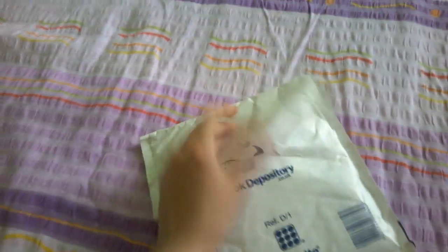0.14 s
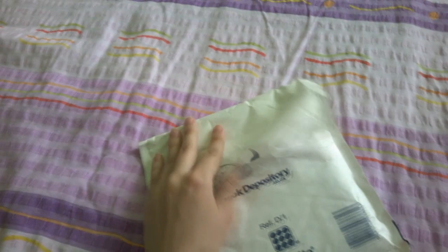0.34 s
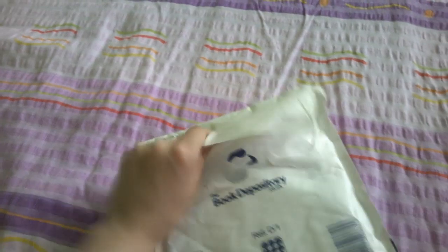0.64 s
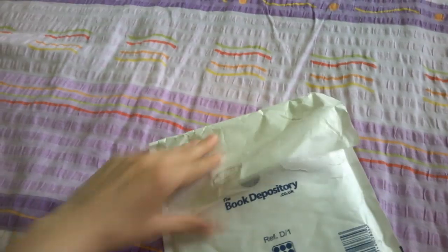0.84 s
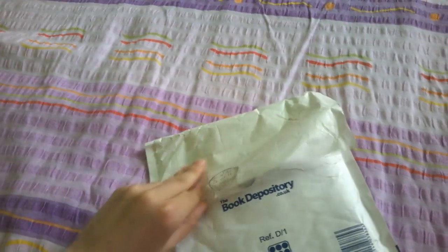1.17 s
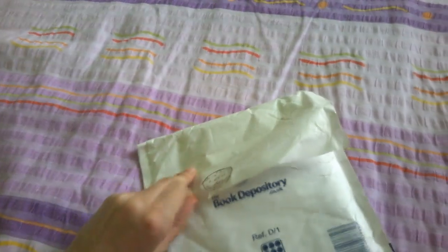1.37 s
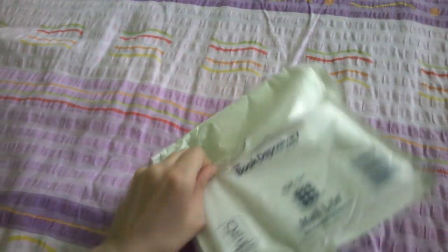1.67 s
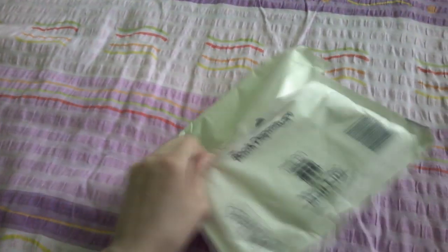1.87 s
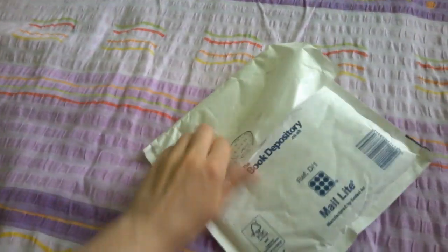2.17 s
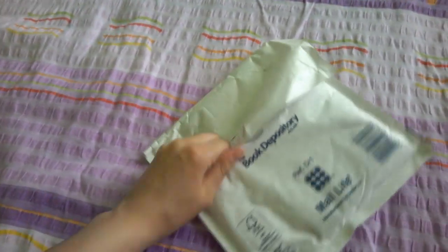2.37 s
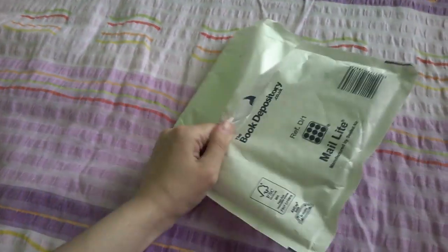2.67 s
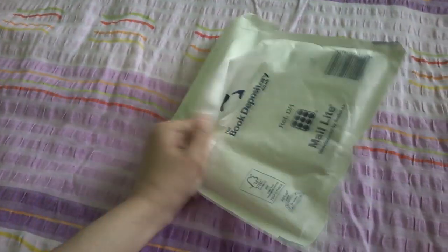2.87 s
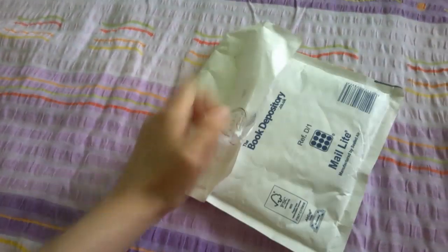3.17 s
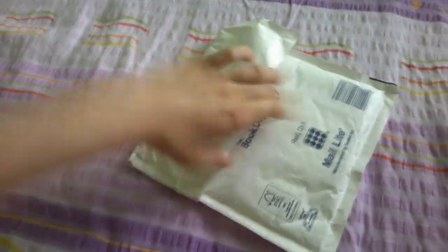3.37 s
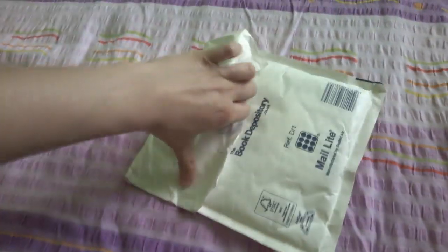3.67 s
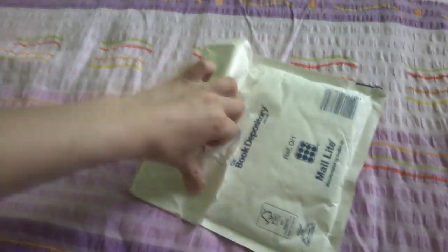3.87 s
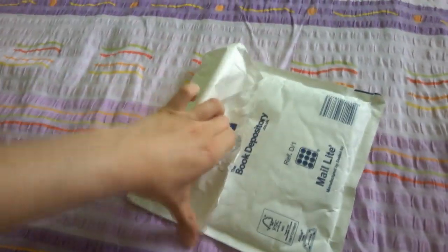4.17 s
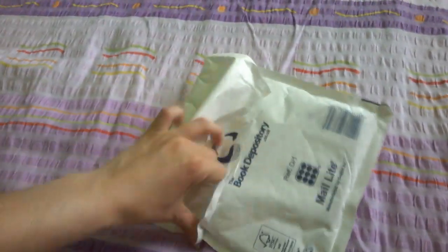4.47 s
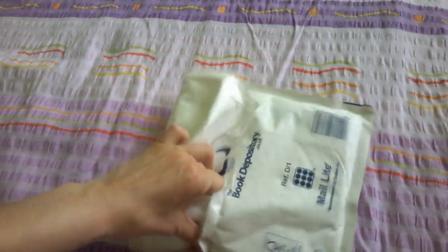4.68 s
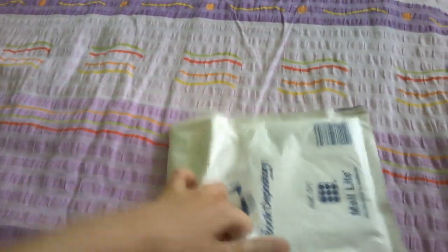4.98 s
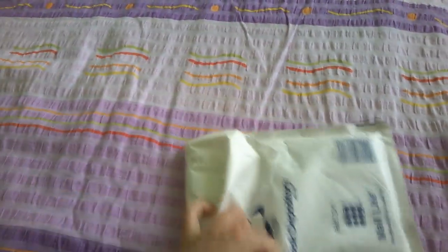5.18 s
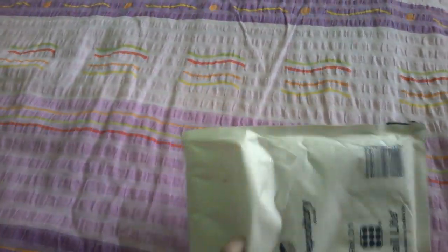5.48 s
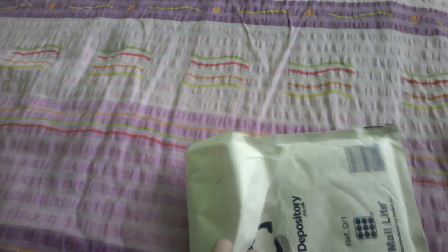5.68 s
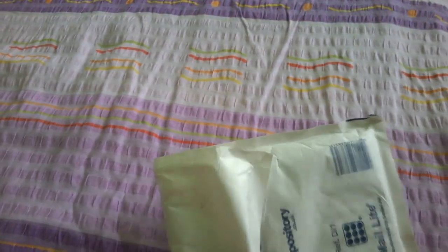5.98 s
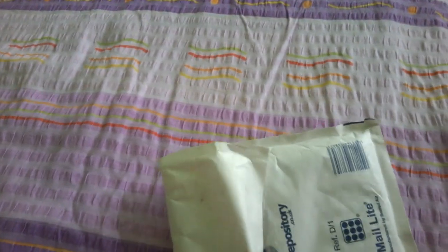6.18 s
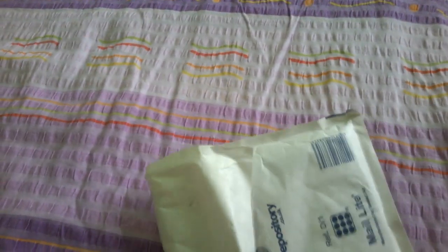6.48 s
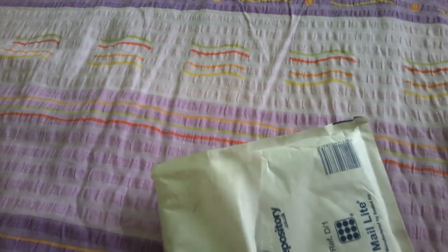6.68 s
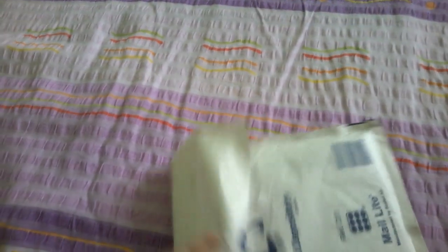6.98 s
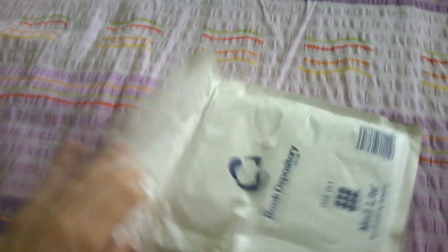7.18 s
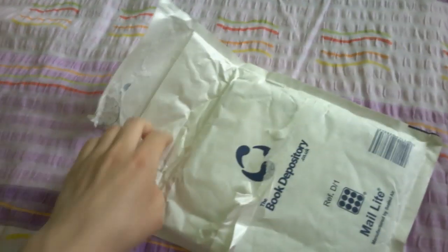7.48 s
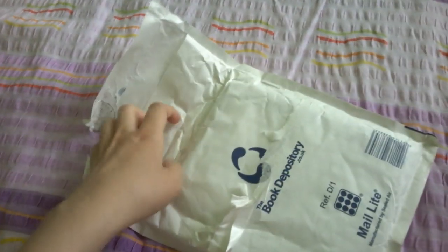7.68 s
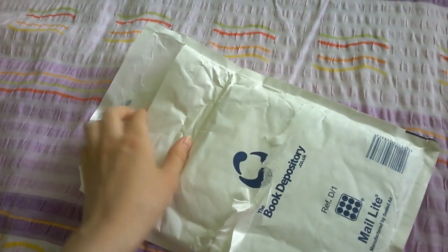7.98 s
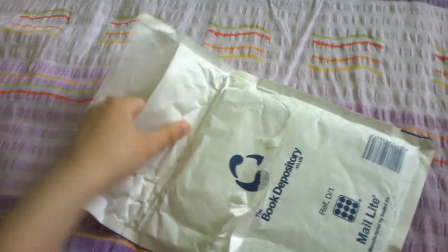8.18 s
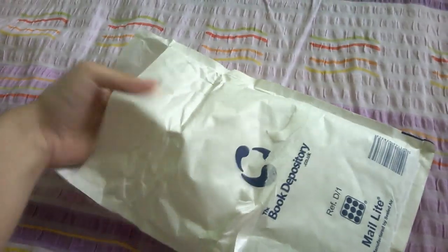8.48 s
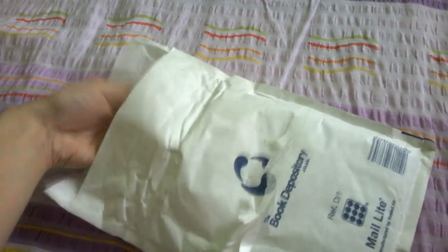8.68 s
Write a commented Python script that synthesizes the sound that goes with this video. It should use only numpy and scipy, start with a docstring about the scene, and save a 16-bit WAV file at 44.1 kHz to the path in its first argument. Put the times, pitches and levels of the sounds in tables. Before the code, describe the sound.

Dry, close, single-channel sound of a padded paper mailer being gripped, torn and crumpled on a bed. From 0 to 0.9 s there are brisk crinkles and hard snaps, the strongest near 0.6 s. From 1 to 2.5 s it is sparser, with separate sharp ticks over faint rustle. A bright crack at about 2.65 s leads to a cluster around 3 s with a barely audible soft puff, then a quieter gap. From 3.9 to 5.5 s dense tearing crackle and many snaps arrive, some low and boomy. After a thinner stretch near 6 s, busy ripping pops return from 6.3 to 6.85 s. From 7 s it is mostly light, small rustles, with clearer snaps around 7.8, 8.2 and 8.5 s and a faint puff near 8.8 s. A distant low wavering engine hum swells around 5.5-6.5 s, then fades into quiet low room air.

```python
"""Dense crackle and sharp snaps, heard close: one hand tears and crumples a padded paper mailer on a bed.
Each crease is a millisecond pop and noise burst, coloured by band, with a faint rattling tail.
Soft low puffs of band-passed noise mark the packet meeting the bedding.
Far behind, three wavering harmonics drone like an engine over drifting, filtered-noise air."""
import sys
import numpy as np
from scipy import signal
from scipy.fft import rfft, irfft
from scipy.io import wavfile
from scipy.ndimage import uniform_filter1d

SR = 44100
rng = np.random.default_rng(int(sys.argv[2]) if len(sys.argv) > 2 else 0)


def pcm_store(signal):
    """Save signal as 16-bit PCM."""
    levels = np.round(np.clip(np.atleast_2d(signal), -1, 1) * 32767)
    wavfile.write(sys.argv[1], SR, levels.astype(np.int16).T)


N = 389844

# loud single creases: (time [s], relative size [dB], ring pitch [Hz], boom re the paper's usual balance [dB])
SNAPS = [(0.0627, -1.5, 4020, -7), (0.1651, -12, 3700, -4), (0.2852, -7.5, 3500, -6),
         (0.4248, -9, 3570, -35), (0.4805, -6, 2770, 8.5), (0.6014, 3, 3500, -13),
         (0.7962, -14.0, 3990, -8), (1.2245, -3, 3460, -22), (1.2381, -13, 3320, -15),
         (1.406, -4.5, 3300, -19), (1.5408, -9.5, 2680, 2), (1.6995, -4, 3250, -18),
         (2.1331, -12, 3870, -19), (2.4309, -16.5, 3670, 7.5), (2.588, -16, 2740, 15),
         (2.6554, 1, 3400, -10), (2.6672, -10.5, 3680, 17), (2.8036, -8.5, 3400, -1),
         (2.881, -10.5, 3900, 4), (2.982, -4.5, 3400, 1), (3.0164, -10.5, 3380, 16),
         (3.795, -12.5, 2870, -3), (3.856, -11.5, 3250, -11), (3.9387, -9.5, 2720, 5.5),
         (3.9603, 2, 2600, -5), (4.005, -1.5, 3600, -4), (4.0867, -1.5, 3430, -35),
         (4.1109, -10, 4130, -25), (4.1606, -11, 3550, -36), (4.3, -14, 2900, -13), (4.3452, -4.5, 3800, 3),
         (4.3863, -7, 3160, -4), (4.3994, -1.0, 3700, 2.5), (4.4544, -10.5, 2760, 11),
         (4.4624, -12, 2700, 12), (4.5226, -4.5, 3200, -10), (4.6271, -2.5, 2930, 7),
         (4.7437, -7.5, 3160, 5), (4.7685, -1.5, 2800, 1), (4.9279, -10.5, 3200, -9),
         (5.0628, -12.5, 3850, -3), (5.1522, -12, 2700, 12), (5.1711, -2, 4540, 2.5),
         (5.2003, -8.0, 2410, 11.5), (5.2418, -9.5, 4050, 9.5), (5.4758, -6.5, 3500, 10),
         (5.4955, -10.5, 2770, 11), (5.7785, -6, 3520, -1), (5.7901, -4, 2420, 4), (6.295, -11, 2810, 9),
         (6.3312, -7, 3050, 4.5), (6.4275, -11, 4350, -11), (6.47, -10.5, 4340, -27),
         (6.5048, -12.5, 4010, -16), (6.5178, -12.0, 3580, -4), (6.5605, -5.5, 2650, -5),
         (6.586, -8, 3250, 8), (6.606, -8.5, 3600, 4), (6.665, -16, 2400, 0), (6.7133, -6.0, 2850, -2),
         (6.7736, -3.5, 3700, -7), (6.8318, -15, 3200, -3), (7.3894, -16, 2150, 9), (7.404, -16, 2300, 12),
         (7.497, -16.5, 2840, 12.5), (7.62, -17.5, 3440, 8), (7.741, -14.5, 3710, -5),
         (7.8085, -10, 3410, -13), (7.929, -16, 2600, 2.5), (8.18, -6, 4130, -5), (8.309, -7.0, 3370, 2.5),
         (8.5371, -6.0, 2970, 2), (8.6097, -11, 2640, 15.5), (8.67, -25.5, 3720, 20)]
# overlapping grips and crumples:
# (start [s], hold [s], relative crackle level [dB], boom re the paper's usual balance [dB])
HAND_MOVES = [(0.0, 0.047, -19.5, 2.5), (0.147, 0.38, -34.5, -10.5), (0.572, 0.073, -21.5, -7),
              (0.632, 0.032, -18.5, 4.5), (0.752, 0.088, -40.5, -20), (0.922, 0.039, -43.5, -13),
              (1.007, 0.0065, -34, -12), (1.152, 0.034, -41.5, -12), (1.199, 0.033, -36.5, -3),
              (1.389, 0.027, -31.5, -8), (1.458, 0.13, -35.5, -5), (1.62, 0.25, -39.5, -10),
              (1.902, 0.21, -38, 5), (2.229, 0.38, -34.5, -6), (2.66, 0.046, -32.5, -1),
              (2.743, 0.21, -40, 4), (2.986, 0.011, -21.5, 2), (3.144, 0.061, -38.5, -14),
              (3.496, 0.18, -35, 3), (3.703, 0.12, -41.5, -3), (3.897, 0.039, -24.5, 3),
              (3.989, 0.16, -37.5, -3.5), (4.28, 0.31, -33.5, -0.5), (4.589, 0.077, -24, 4),
              (4.713, 0.068, -30, 11.5), (4.929, 0.013, -27, 4.5), (4.983, 0.38, -33.5, -1),
              (5.393, 0.1, -25.5, 6), (5.592, 0.22, -31.5, 0.5), (5.886, 0.3, -34, -8.5),
              (6.019, 0.039, -21, 5.5), (6.276, 0.37, -32, 0.5), (6.717, 0.055, -20, -1),
              (6.817, 0.17, -32, -4.5), (6.95, 0.017, -28.5, 11.5), (7.023, 0.45, -41, -7.5),
              (7.068, 0.074, -33, -27), (7.268, 0.051, -32.5, 6), (7.532, 0.15, -41, -3),
              (7.725, 0.24, -44.5, -17), (7.817, 0.0073, -23, 4), (8.047, 0.14, -39, 6),
              (8.237, 0.009, -27, -1), (8.33, 0.19, -33.5, -2.5), (8.564, 0.0085, -29.5, 16),
              (8.665, 0.019, -38.5, 13), (8.752, 0.036, -31, -1)]
# spectrum shape of a snap as heard: (frequency [Hz], relative density [dB per Hz])
PAPER_SPECTRUM = [(280, -14), (498, -12), (650, -23.5), (980, -8), (1180, -7), (1550, -9.5), (2660, -4.5),
                  (4060, -4), (5790, -16.5), (7990, -12), (10500, -25), (13300, -27.5), (16000, -40)]
# edges of the neighbouring crease bands: (frequency [Hz])
BAND_EDGES_HZ = (220, 680, 1150, 1500, 2000, 2500, 3100, 3800, 4600, 6000, 10000, 17000)
# packet landing on the bedding: (time [s], relative peak level [dB])
THUMPS = [(3.017, -51), (6.75, -41.5), (8.784, -39.5)]
# far drone before its waver: (time [s], pitch [Hz], first, second, third harmonic RMS level [dB])
DRONE = [(0, 62.5, -69, -71, -79), (3.401, 62.55, -56, -66.5, -64), (4.7, 62.55, -51.5, -57, -59.5),
         (5.1, 62.1, -68.5, -70.5, -86), (5.7, 63.1, -45, -53, -52.5), (6.25, 61.76, -41.5, -55.5, -59),
         (6.8, 62.5, -56, -54, -58.5), (7.44, 59.85, -71, -55, -66), (8.84, 58.3, -74, -65, -67)]
# spectrum shape of the background air: (frequency [Hz], relative density [dB per Hz])
AIR_SPECTRUM = [(20, 1), (45, -1.5), (85, 3), (123, -7.5), (193, 0.5), (1000, -25.5), (3630, -56.5),
                (16000, -41)]

AIR_DB = -56.0  # RMS before its drift
BOOM_HZ, BOOM_REACH_OCT = 680, 1  # boom spills into the neighbouring bands
CRACK_HZ = 6000  # bands from here up take the crack level
RING_WIDTH_OCT = 0.6
RISE_DB_S, FALL_DB_S = 552, 250  # crackle swell before a move, decay after it
SETTLE_DB = -61.5  # relative crackle level once the paper is let go
LIMIT, TOP_HZ = 0.9, 16000  # ceiling amplitude, low-pass edge


def snaps():
    """Loud creases ring at their own pitch and boom; higher ones crack brighter, the packet hardly moves."""
    time_s, size_db, ring_hz, boom_db = np.transpose(SNAPS)
    crack_db = 13 * np.log2(ring_hz / 3500)
    sizes = tinted(size_db, ring_hz, boom_db, crack_db, body_db=-4.0, ring_db=7.5, tint_db=3.5)
    return bursts(time_s, sizes, pop_db=5, jolt_db=-5, snap_s=0.00037, tail_s=0.013, tail_db=-28)


def crackle(count=9000):
    """Many small random creases, a few far larger; a harder grip is brighter and shakes the whole packet."""
    time_s = rng.random(count) * N / SR
    spread = rng.exponential(size=count)
    at = (time_s * SR).astype(int)
    hand_db, boom_db = handling(time_s)
    hand_db = hand_db + 1.33 * wander(45)[at]  # stick and slip clusters the creases
    # neighbouring creases ring alike
    ring_oct = 0.65 * wander(12)[at] + 0.37 * rng.standard_normal(count)
    ring_hz = 3200 * 2 ** ring_oct
    size_db = hand_db + 4.243 * np.minimum(spread, 5.5)
    crack_db = 0.22 * (hand_db + 38.5)
    body_db = 0.28 * (hand_db + 37.5)
    sizes = tinted(size_db, ring_hz, boom_db, crack_db, body_db, ring_db=7, tint_db=3.5)
    return bursts(time_s, sizes, pop_db=-1.5, jolt_db=-8.5, snap_s=0.00025, tail_s=0.0071, tail_db=-25)


def handling(time_s):
    """Crackle level and boom: each move rises, holds and falls; powers add, boom is power-weighted."""
    power, boom = undb(2 * SETTLE_DB), 0  # doubled dB gives power
    for start_s, hold_s, move_db, boom_db in HAND_MOVES:
        early_s = np.maximum(start_s - time_s, 0)
        late_s = np.maximum(time_s - start_s - hold_s, 0)
        share = undb(2 * (move_db - RISE_DB_S * early_s - FALL_DB_S * late_s))
        power = power + share
        boom = boom + share * boom_db
    return 10 * np.log10(power), boom / power


def tinted(size_db, ring_hz, boom_db, crack_db, body_db, ring_db, tint_db):
    """Crease size per band: packet body lowest, then boom, own ring, crack on top, and a chance colour."""
    low_hz = np.array(BAND_EDGES_HZ[:-1])[:, None]
    high_hz = np.array(BAND_EDGES_HZ[1:])[:, None]
    tint = rng.standard_normal((len(size_db), len(low_hz))).T
    distance_oct = np.log2(np.sqrt(low_hz * high_hz) / ring_hz)
    ring_shape = np.exp(-(distance_oct / RING_WIDTH_OCT) ** 2)
    ring = undb(ring_db * ring_shape + tint_db * tint)
    ring = ring / np.sqrt(np.mean(ring ** 2, axis=0))  # colour leaves the size alone
    boom_share = np.exp(-np.abs(np.log2(low_hz / BOOM_HZ)) / BOOM_REACH_OCT)
    crack = (low_hz >= CRACK_HZ) * crack_db
    body = (low_hz == low_hz[0]) * body_db
    return ring * undb(size_db + boom_share * boom_db + crack + body)


def bursts(time_s, sizes, pop_db, jolt_db, snap_s, tail_s, tail_db):
    """A crease flips with a sharp pop inside a short noise burst; the sheet rattles on faintly after it."""
    at = np.clip((time_s * SR).astype(int), 0, N - 1)
    lead = int(.0005 * SR)  # samples from burst onset to pop
    pop_at = np.minimum(at + lead, N - 1)
    jolt, rattle = rng.standard_normal((2, N))
    side = np.sign(jolt[at])  # creases flip up or down
    out = 0
    for response, size in zip(bands(), sizes):
        power = np.bincount(at, size ** 2, N)
        pop = undb(pop_db) * np.bincount(pop_at, side * size, N)
        swell = fade(fade(power, lead / SR) / lead, snap_s)
        snap = undb(jolt_db) * np.sqrt(swell) * jolt
        tail = undb(tail_db) * np.sqrt(fade(power, tail_s)) * rattle
        out = out + signal.oaconvolve(pop + snap + tail, response)[:N]
    return out


def bands():
    """Paper response cut into neighbouring bands, so that every crease can have its own colour."""
    click = colour(np.r_[1., np.zeros(2048)], PAPER_SPECTRUM)[:2048]
    click = click / np.linalg.norm(click)
    responses = []
    for k, edges_hz in enumerate(zip(BAND_EDGES_HZ, BAND_EDGES_HZ[1:])):
        band = signal.butter(2, edges_hz, "band", fs=SR, output="sos")
        # neighbours meet in opposite phase, so every other band is inverted
        responses.append((-1) ** k * signal.sosfilt(band, click))
    return responses


def thumps():
    """Soft low puffs as the packet meets the bedding: smoothed noise under a twice-smoothed push."""
    time_s, peak_db = np.transpose(THUMPS)
    hits = np.bincount((time_s * SR).astype(int), undb(peak_db + 14.5), N)
    push = fade(fade(hits, 0.0043) / (0.004 * SR), 0.0074)
    noise = level(fade(rng.standard_normal(N), 0.00064), 0)
    low_band = signal.butter(1, (25, 300), "band", fs=SR, output="sos")
    return signal.sosfilt(low_band, noise * push)


def drone():
    """Three harmonics of a gliding pitch, each wavering in strength on the way in through the walls."""
    time_s, *columns = np.transpose(DRONE)
    hz, *harmonics_db = (np.interp(np.arange(N) / SR, time_s, c) for c in columns)
    phase = 2 * np.pi * np.cumsum(hz) / SR
    out = 0
    for harmonic, db in enumerate(harmonics_db, 1):
        strength = np.sqrt(2) * undb(db + 4.4 * wander(11))  # RMS to peak
        out = out + strength * np.sin(harmonic * phase)
    return out


def rumble():
    """Background air: filtered noise whose strength drifts."""
    air = level(colour(rng.standard_normal(N), AIR_SPECTRUM), AIR_DB)
    return air * undb(4.4 * wander(5))


def undb(db):
    """Amplitude ratio from dB."""
    return 10 ** (np.asarray(db) / 20)


def level(x, db):
    """Scale to an RMS level in dB."""
    return x * undb(db) / np.sqrt(np.mean(x ** 2))


def colour(x, points, size=4096):
    """Causal filter with the given spectrum, from the folded cepstrum of its log gain."""
    hz, db = np.transpose(points)
    bin_hz = np.arange(size // 2 + 1) * SR / size
    log_gain = np.interp(np.log(bin_hz + 1), np.log(hz), db) * np.log(10) / 20
    cepstrum = irfft(log_gain)
    cepstrum[1:size // 2] *= 2
    cepstrum[size // 2 + 1:] = 0
    response = irfft(np.exp(rfft(cepstrum)))
    return signal.fftconvolve(x, response)[:N]


def fade(x, seconds):
    """Each impulse rises at once and dies away exponentially with this time constant."""
    return signal.lfilter([1], [1, -np.exp(-1 / (seconds * SR))], x)


def wander(rate_hz):
    """Random levels held 1 / rate_hz seconds and joined smoothly by a moving average."""
    hold = int(SR / rate_hz)
    steps = np.repeat(rng.standard_normal(N // hold + 1), hold)
    return uniform_filter1d(steps, hold)[:N]


def scene():
    """Sum of all layers, one channel."""
    return (snaps() + crackle() + thumps() + drone() + rumble())[None]


def record(dry):
    """Soft limiting flattens only the loudest peaks; a steep low-pass cuts the top."""
    limited = dry / (1 + (dry / LIMIT) ** 6) ** (1 / 6)
    low_pass = signal.ellip(10, .2, 60, TOP_HZ, fs=SR, output="sos")
    return signal.sosfilt(low_pass, limited)


dry = scene()
out = record(dry)
pcm_store(out)
```